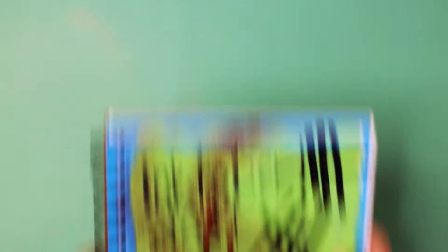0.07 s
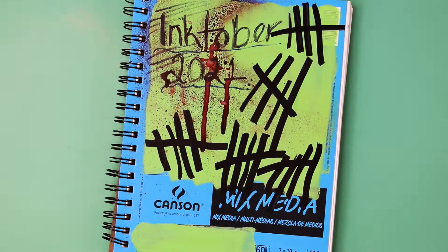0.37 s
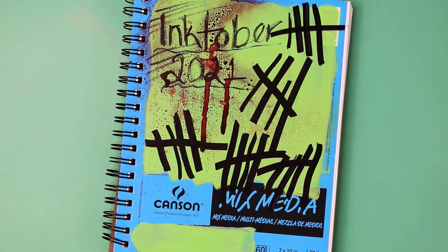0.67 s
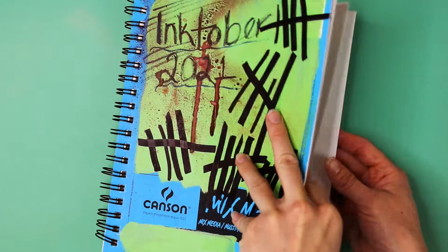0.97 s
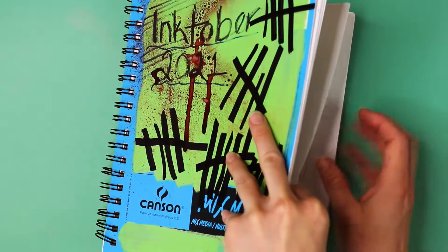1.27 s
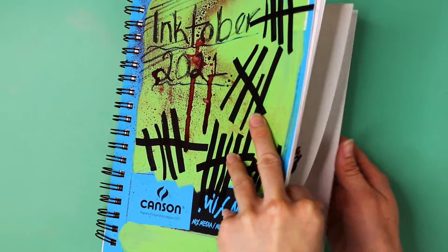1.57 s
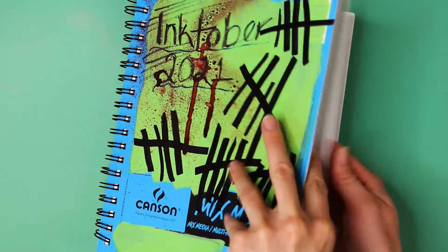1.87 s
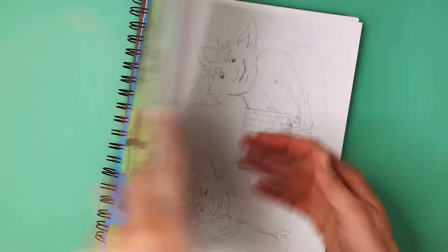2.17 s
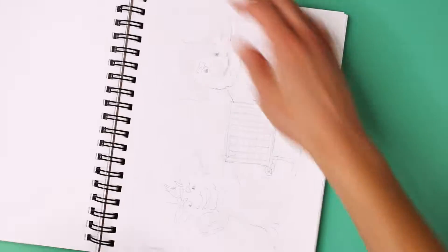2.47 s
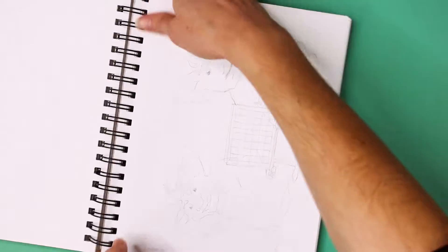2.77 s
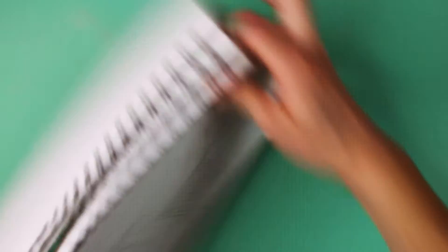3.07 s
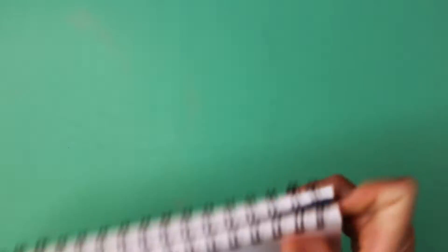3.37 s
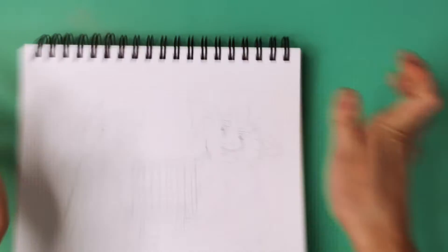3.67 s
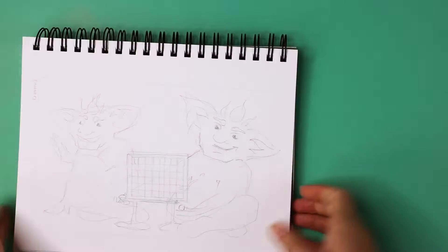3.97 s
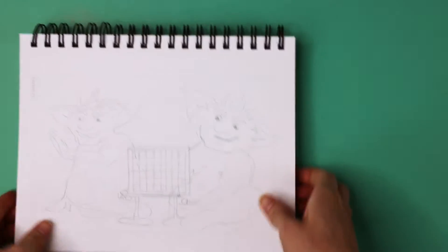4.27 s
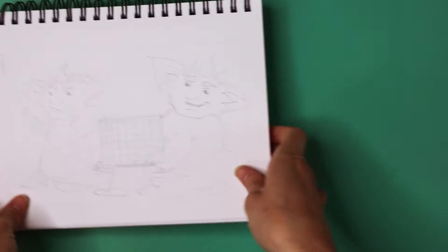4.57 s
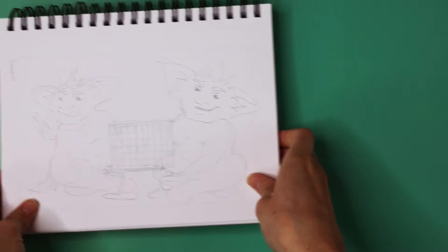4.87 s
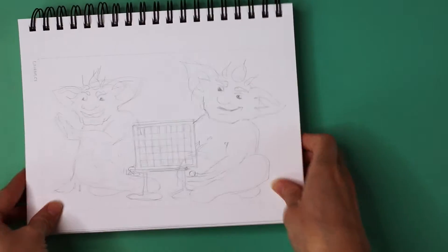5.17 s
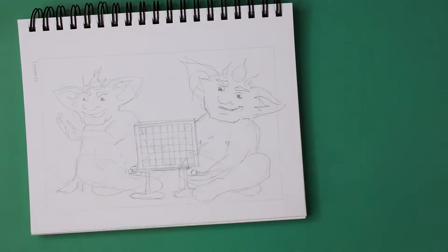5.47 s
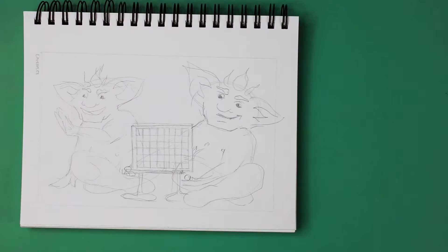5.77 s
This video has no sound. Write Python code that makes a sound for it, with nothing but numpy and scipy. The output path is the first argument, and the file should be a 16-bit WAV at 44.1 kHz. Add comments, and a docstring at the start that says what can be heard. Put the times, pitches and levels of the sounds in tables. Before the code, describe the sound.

Close to the microphone in a small room, a sketchbook lands on a desk with a heavy thump. Paper slips and rustles under the fingers, the cover flops open, and the wire binding clicks as the book is turned over. It comes down a second time with a sharp smack, then is nudged straight with light bumps, a crisp click and short scrapes, over faint room hiss.

```python
"""In a small room, a spiral-bound sketchbook is dropped on a desk, close to the microphone.
Fingers leaf along the page edges, the cover slaps open, and the book is folded back, turned,
dropped again and slid straight. Each blow makes the desk boom, the book ring and the sheets slap.
Sliding paper rubs and hisses, the wire binding clicks, and the walls add a short echo.
The hardest blows overload the recorder and briefly turn its volume down."""
import sys
import numpy as np
from scipy import signal
from scipy.fft import rfft, irfft
from scipy.io import wavfile

SR = 44100
rng = np.random.default_rng(int(sys.argv[2]) if len(sys.argv) > 2 else 0)


def materialize(psi):
    """Save the field psi as 16-bit PCM at rate SR to the path in sys.argv[1].

    A 1-D psi becomes a single channel; in a 2-D psi each row is a channel.
    """
    bounded = np.clip(np.atleast_2d(psi).T, -1, 1)
    quanta = np.round(bounded * 32767).astype(np.int16)
    wavfile.write(sys.argv[1], SR, quanta)


N = 265129

# A sheet slips past the thumb, or the book slides on the desk:
# (start [s], end [s], rub level [dB], rub pitch [Hz], edge hiss level [dB])
SLIDES = [(0.178, 0.279, -55.5, 3030, -44.5), (1.016, 1.086, -43.5, 2360, -53.5),
          (1.067, 1.114, -37.5, 2400, -40), (1.152, 1.225, -42, 2270, -41), (1.223, 1.397, -44, 2120, -43),
          (1.346, 1.409, -34.5, 4230, -42), (1.373, 1.479, -35.5, 3050, -62),
          (1.465, 1.569, -32, 2530, -47.5), (1.561, 1.653, -37.5, 2480, -47),
          (1.626, 1.647, -34.5, 1560, -42), (1.739, 1.833, -36.5, 2200, -39.5),
          (1.808, 1.977, -37, 2200, -40.5), (1.983, 2.045, -46.5, 695, -73), (2.117, 2.17, -49, 2020, -38),
          (2.492, 2.519, -40, 5040, -59), (2.879, 2.903, -41.5, 1030, -53), (3.022, 3.056, -41.5, 595, -44),
          (3.435, 3.477, -39, 1370, -41.5), (3.478, 3.517, -36, 1180, -40),
          (3.625, 3.693, -53.5, 3000, -46), (3.843, 3.99, -50, 1210, -53), (4.338, 4.378, -56, 2000, -51),
          (4.57, 4.587, -30, 5700, -37), (4.583, 4.626, -40, 2940, -43.5), (4.489, 4.55, -34.5, 2000, -58),
          (4.652, 4.723, -43, 586, -50), (5.278, 5.355, -40.5, 595, -44), (5.838, 5.884, -51, 5000, -52.5)]
# Fingers, corners and edges bump the book: (time [s], level [dB], pitch [Hz])
LIGHT_BUMPS = [(.297, -30, 390), (.307, -16.5, 540), (.315, -14, 356), (.372, -11, 221),
               (2.002, -37.5, 620), (2.385, -32, 203), (2.42, -35, 800), (3.105, -41, 338),
               (3.251, -34, 520), (3.264, -29, 400), (3.316, -22.5, 940), (3.487, -28.5, 480),
               (3.51, -12.5, 260), (3.515, -18, 615), (3.856, -21, 607), (4.066, -31, 350),
               (4.234, -38, 200), (4.311, -21, 301), (4.411, -28, 640), (5.363, -34, 382),
               (5.370, -21, 330)]
# The book or its cover falls flat:
# (time [s], desk level [dB], book level [dB], pitch [Hz], slap level [dB], flutter level [dB])
FLAT_FALLS = [(0.3318, 1, 12, 400, 5, -3), (0.3399, -2, 2.5, 376, -12, -15),
              (2.5237, -17.5, 0.5, 622, 4.5, -18), (3.7926, -11, -2.5, 414, -3, -12),
              (3.802, -24.5, -7.5, 480, 1.5, -15)]
# Wire rings and sheet edges snap: (time [s], level [dB], pitch [Hz])
SNAPS = [(0.513, -33, 5150), (0.5366, -33.5, 5040), (.713, -35.5, 1820), (1.999, -27.5, 6500),
         (2.150, -21, 7000), (2.433, -28.5, 4000), (3.104, -29, 6100), (3.253, -18, 4000),
         (3.2668, -16.5, 5400), (3.318, -20.5, 1700), (3.362, -34, 1960), (3.391, -36, 6500),
         (3.447, -27, 2650), (3.507, -21.5, 6470), (3.511, -24, 3760), (3.8082, 6.5, 2200),
         (4.312, -33, 6900), (4.460, -31, 2300), (4.4886, -7, 9200), (4.524, -24.5, 1850),
         (4.676, -26.5, 1800), (5.785, -31.5, 5300)]
# The rustle of hands holding the book: (time [s], level [dB])
HAND_LEVELS = [(.9, -69), (1.3, -49.5), (1.7, -50.5), (2.02, -49.5), (2.07, -53.5), (2.18, -46),
               (2.3, -52.5), (2.52, -50), (2.62, -57.5), (3.0, -56.5), (3.4, -52), (3.6, -48),
               (3.78, -75.5), (4.27, -80.5), (4.36, -55.5), (4.53, -57), (4.7, -45.5), (4.8, -77)]
# The tones of the desk and book when hit: (pitch [Hz], level [dB], time to fade by 60 dB [s])
DESK_TONES = [(45, -24.5, .25), (80, -4.5, 0.1), (99.3, 2, 0.13), (121, 2, 0.065), (156, -11, 0.22),
              (188.3, -6, 0.3)]
BOOK_TONES = [(205, 1, 0.12), (270, -5, 0.12), (328, 1.5, 0.076), (367, 4, 0.062), (453, -5, 0.035),
              (489, -2.5, 0.026), (517.5, 0, 0.065), (577, -6.5, 0.06), (617.5, -1, 0.087), (860, -2, .05),
              (1230, -9.5, 0.052), (1630, -6.5, 0.044)]
# How strong each kind of noise is, from bass to treble: (frequency [Hz], level [dB])
AIR_SPECTRUM = [(15, -35.5), (25, -7.5), (80, -3), (130, -1), (211, -5), (277, -2.5), (309, -3), (344, -5),
                (1230, -10.5), (7100, -20.5), (12900, -35), (16000, -53)]
RUB_SPECTRUM = [(150, -28.5), (400, -9), (650, 4), (1100, 2.5), (1600, 3.5), (3000, 0), (5000, 1),
                (8000, -8), (10000, -32), (15000, -41.5)]
HISS_SPECTRUM = [(400, -15), (2000, -13.5), (5000, -13.5), (6400, -4), (7500, -0.5), (8600, -11),
                 (10500, -20), (15000, -39.5)]
SLAP_SPECTRUM = [(100, -29), (300, -15), (620, 4), (780, -6.5), (950, 3), (1400, 3.5), (2800, -4),
                 (4500, -8.5), (7500, -8), (10000, -25), (15000, -34.5)]
CLICK_SPECTRUM = [(150, -25.5), (500, 1), (1200, 8.5), (3000, 4.5), (5000, 2.5), (8000, 1.5), (10000, -8.5),
                  (15000, -49)]
# The echo off the walls: (frequency [Hz], time to fade by 60 dB [s], level [dB])
WALL_ECHO = [(90, 0.72, -17), (300, 0.69, -24.5), (553, 0.41, -19.5), (1020, 0.1, -13.5), (2960, 0.12, -16),
             (10000, 0.047, -13)]


def from_db(db):
    """Turn decibels into a number to multiply by."""
    return 10 ** (np.asarray(db) / 20)


def decay(fade_s):
    """A half-second curve that falls by 60 dB every fade_s seconds."""
    return from_db(-60 * np.arange(SR // 2) / SR / fade_s)


def add(out, time, sound):
    """Mix a sound in at a time given in seconds."""
    part = out[round(time * SR):][:len(sound)]
    part += sound[:len(part)]


def wobble(per_s, size):
    """A random wavering of typical size 1 that picks a new value per_s times a second."""
    position = np.arange(size) / SR * per_s
    curve = np.interp(position, np.arange(N // 8), rng.standard_normal(N // 8))
    return curve / np.sqrt(np.mean(curve ** 2))


def patter(strength):
    """Countless tiny contacts, each a random push or pull of the given strength."""
    return strength * rng.choice([-1, 1], len(strength))


def coloured(force, spectrum, peak_hz=1000, peak_db=0, octaves=.5, ripple_db=0):
    """An object colours a noise with its spectrum, one main resonance and a ripple of smaller ones."""
    size = 4096
    bins = np.fft.rfftfreq(size, 1 / SR) + 1
    hz, db = np.transpose(spectrum)
    shape_db = np.interp(np.log(bins), np.log(hz), db)
    shape_db += peak_db / (1 + (np.log2(bins / peak_hz) / octaves) ** 2)
    # the smaller resonances grow wider towards the treble, where paper damps more
    shape_db += ripple_db * np.interp(2 * np.sqrt(bins / 25), np.arange(size), rng.standard_normal(size))
    # build the filter so that nothing sounds before its cause (minimum phase)
    cepstrum = irfft(np.log(from_db(shape_db)))[:size // 2]
    response = irfft(np.exp(rfft(2 * cepstrum, size)))
    return signal.fftconvolve(force, response / np.linalg.norm(response))[:len(force)]


def room_air(level_db=-51.5):
    """The room's faint, steady rumble and hiss."""
    return from_db(level_db) * coloured(rng.standard_normal(N), AIR_SPECTRUM)


def friction(speed, grain_db=2.0, judder_db=0.8):
    """Paper fibres catch and slip, and the hand's pressure shakes."""
    roughness_db = grain_db * wobble(1100, len(speed)) + judder_db * wobble(99, len(speed))
    return patter(speed * from_db(roughness_db))


def paper_slides():
    """Each slide swells and fades, with a rubbing sheet and a hissing edge."""
    out, t = np.zeros(N), np.arange(SR // 2) / SR
    for start, end, rub_db, hz, hiss_db in SLIDES:
        progress = np.clip(t / (end - start), 0, 1)
        speed = np.abs(np.sin(np.pi * progress)) ** 0.7
        # every grip bends the sheet its own way, giving it other resonances
        rub = coloured(friction(speed), RUB_SPECTRUM, hz, peak_db=11, octaves=.33, ripple_db=1.8)
        hiss = coloured(friction(speed), HISS_SPECTRUM, ripple_db=2.8)
        add(out, start, from_db(rub_db) * rub + from_db(hiss_db) * hiss)
    return out


def room_echo(sound, delay_s=0.0063):
    """Near walls send back a blur of echoes; the bass lingers longest."""
    t, echo = np.arange(SR) / SR, 0
    hz, fade_times, levels = np.transpose(WALL_ECHO)
    edges = np.geomspace(40, 18000, 10)
    for low, high in zip(edges, edges[1:]):
        log_centre = np.log(low * high) / 2
        fade_s = np.interp(log_centre, np.log(hz), fade_times)
        db = np.interp(log_centre, np.log(hz), levels)
        fade = from_db(-60 * t / fade_s) * (t > delay_s)
        tail = rng.standard_normal(SR) * fade / np.sqrt(np.sum(fade ** 2))
        band = signal.butter(2, [low, high], "band", fs=SR, output="sos")
        echo += from_db(db) * signal.sosfilt(band, tail)
    return signal.fftconvolve(sound, echo)[:N]


def struck(tones, level_db, spread_db):
    """One blow sets all of an object's tones ringing, each with a partly random strength."""
    t = np.arange(SR // 2) / SR
    gains = from_db(level_db + spread_db * rng.standard_normal(len(tones)))
    return sum(gain * from_db(db) * decay(fade_s) * np.cos(2 * np.pi * hz * t)
               for gain, (hz, db, fade_s) in zip(gains, tones))


def knock(desk_db, book_db, hz, slap_db, flutter_db=-np.inf):
    """The desk booms, the book rings, and the sheets slap shut and may flutter on."""
    t = np.arange(SR // 2) / SR
    # the book's tones ring most near the pitch of the blow, 17 dB less per octave away
    octaves_away = np.abs(np.log2(np.array(BOOK_TONES)[:, 0] / hz))
    book = struck(BOOK_TONES, book_db - 17 * octaves_away, spread_db=4)
    desk = struck(DESK_TONES, desk_db, spread_db=.5)
    press = 1 - np.exp(-(t * hz / 0.31) ** 2)   # a soft, low blow builds up slowly
    shutting = 1 - np.exp(-t / 0.00023)
    settling = from_db(slap_db) * decay(fade_s=.036) + from_db(flutter_db) * decay(fade_s=.17)
    sheets = coloured(patter(shutting * settling), SLAP_SPECTRUM, hz, peak_db=3.5, octaves=.35)
    return press * (desk + book) + sheets


def bumps(rows):
    """Light knocks: a soft, low one goes into the desk; a hard, high one into the paper."""
    out = np.zeros(N)
    for time, db, hz in rows:
        hardness = np.log2(hz / 360)   # octaves above a middling bump
        lifted = 3.0 < time < 3.7   # the book is in the air, so the desk stays silent
        desk_db = -np.inf if lifted else db - 11.5 - 11 * hardness
        add(out, time, knock(desk_db, db, hz, slap_db=db - 9 + 7.5 * hardness))
    return out


def landings():
    """Flat falls; when the whole book drops, its far edge lands just after the near one."""
    out = np.zeros(N)
    for time, *blow in FLAT_FALLS:
        add(out, time, knock(*blow))
    return out


def clicks():
    """A wire ring or sheet edge snaps, then the sheets around it shiver briefly."""
    out = np.zeros(N)
    fade = decay(fade_s=.015) + from_db(-29) * decay(fade_s=.07)
    for time, db, hz in SNAPS:
        snap = patter(from_db(db) * fade)
        add(out, time, coloured(snap, CLICK_SPECTRUM, hz, peak_db=7.5, octaves=.53, ripple_db=1.5))
    return out


def hand_rustle():
    """Skin and paper brush softly for as long as the hands move."""
    times, levels = np.transpose(HAND_LEVELS)
    speed = from_db(np.interp(np.arange(N) / SR, times, levels, left=-np.inf, right=-np.inf))
    rub = coloured(friction(speed), RUB_SPECTRUM, peak_hz=1700, peak_db=2.5, octaves=.4)
    return rub + from_db(-5) * coloured(friction(speed), HISS_SPECTRUM)


def sinking_cover(start_s=2.675, first_gap_s=.024, slowing=1.2, hz=230):
    """The open cover sinks down in four dull bumps, ever slower and weaker."""
    time, rows = start_s, []
    for k in range(4):
        rows.append((time, -21.5 - 2.5 * k, hz))
        time += first_gap_s * slowing ** k
    return bumps(rows)


def scene():
    """The handled book, its echo and the steady noise of the room."""
    low_cut = signal.butter(2, 42, "high", fs=SR, output="sos")
    blows = signal.sosfilt(low_cut, landings() + bumps(LIGHT_BUMPS) + sinking_cover())
    book = blows + clicks() + paper_slides() + hand_rustle()
    return (book + room_air() + room_echo(book))[None]


def volume_control(sound, threshold_db=-6.5, max_cut_db=10, recovery_db_per_s=23, react_s=0.017):
    """Loud peaks turn the volume down, too late to catch the blow itself; it then creeps back."""
    excess_db = np.clip(20 * np.log10(np.abs(sound) + 1e-9) - threshold_db, 0, max_cut_db)
    creep_db = recovery_db_per_s * np.arange(N) / SR
    held_db = np.maximum.accumulate(excess_db + creep_db, axis=-1) - creep_db
    lag = np.exp(-1 / (react_s * SR))
    cut_db = signal.lfilter([1 - lag], [1, -lag], held_db)
    return sound * from_db(-cut_db)


def record(dry):
    """The sound begins at 0.094 s; the recorder adjusts its volume, flattens the peaks and cuts the highest
    treble."""
    begun = np.arange(N) / SR > 0.094
    clipped = np.clip(volume_control(dry * begun), -1, 1)
    high_cut = signal.cheby2(12, 50, 16500, fs=SR, output="sos")
    return signal.sosfilt(high_cut, clipped)


dry = scene()
out = record(dry)
materialize(out)
```